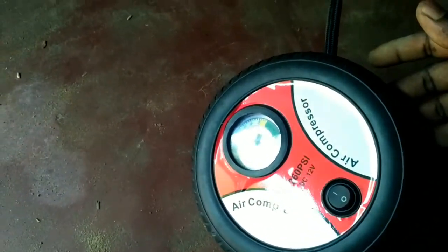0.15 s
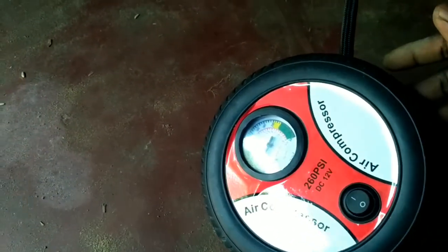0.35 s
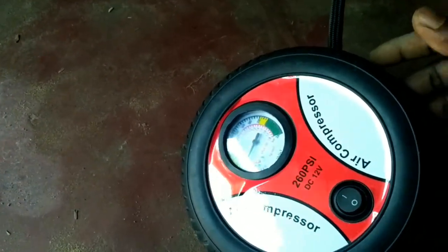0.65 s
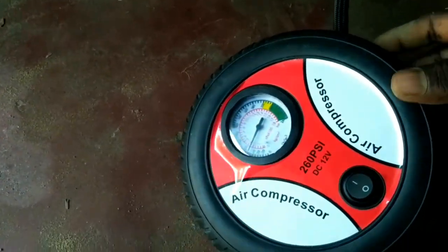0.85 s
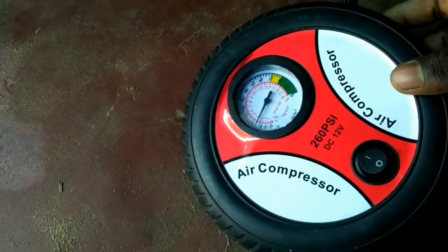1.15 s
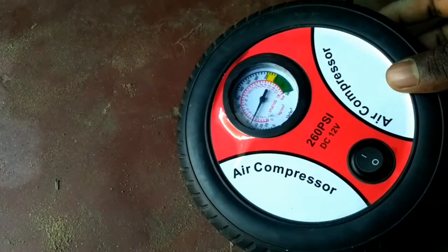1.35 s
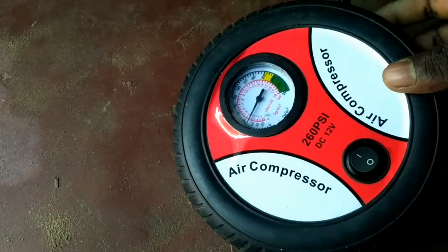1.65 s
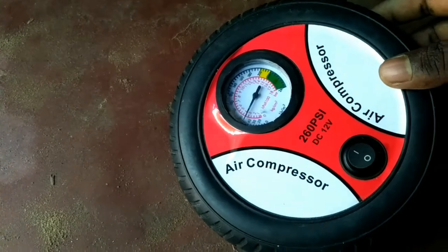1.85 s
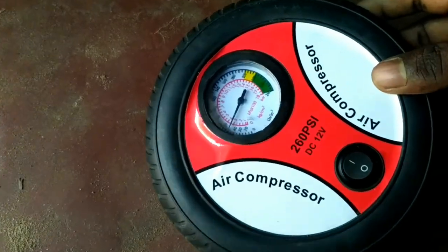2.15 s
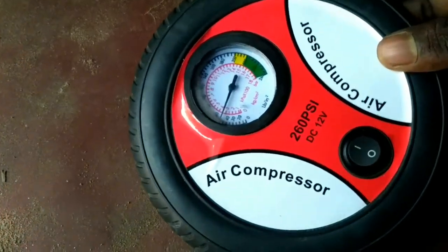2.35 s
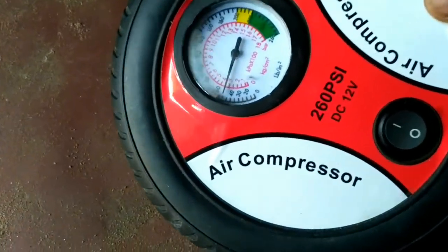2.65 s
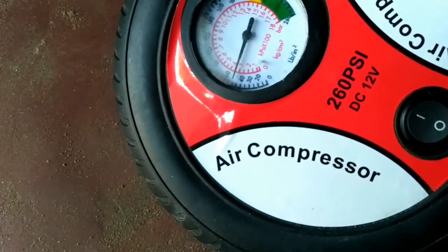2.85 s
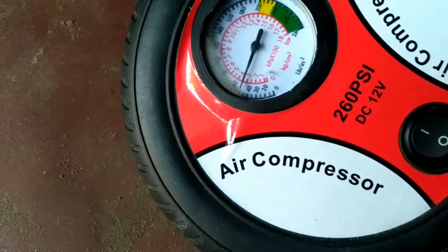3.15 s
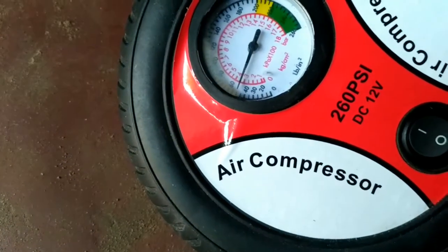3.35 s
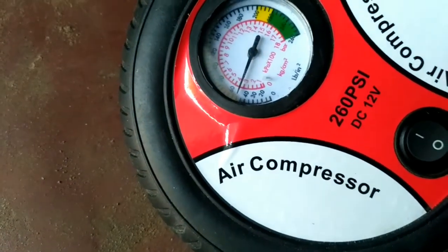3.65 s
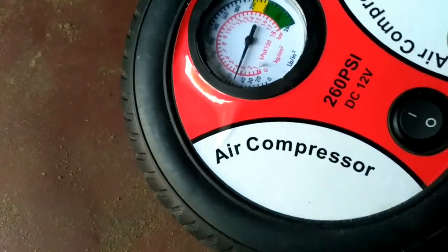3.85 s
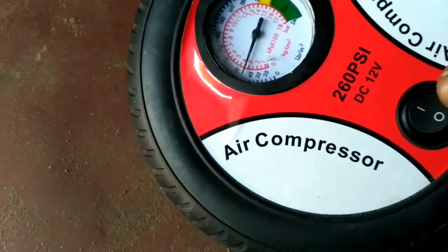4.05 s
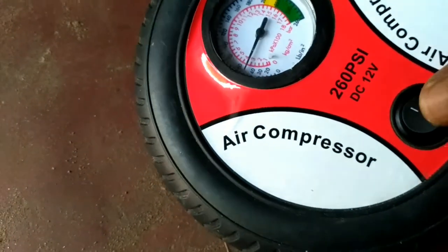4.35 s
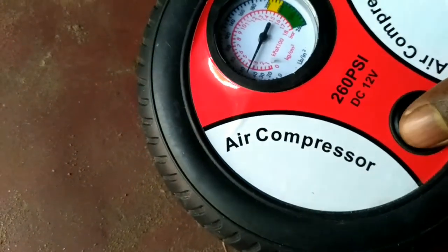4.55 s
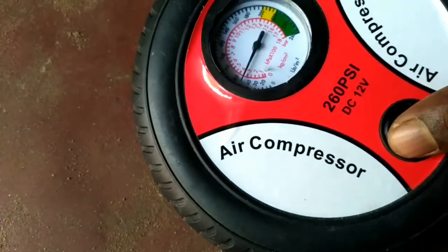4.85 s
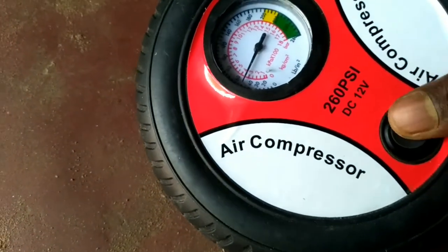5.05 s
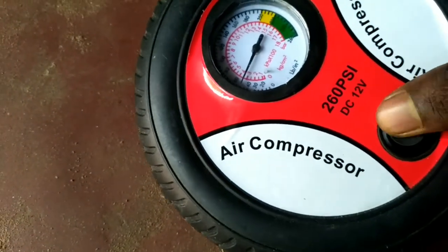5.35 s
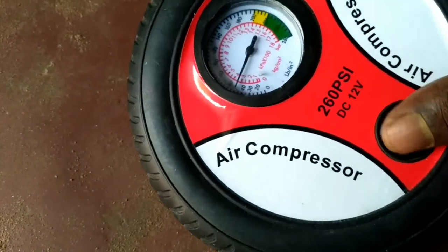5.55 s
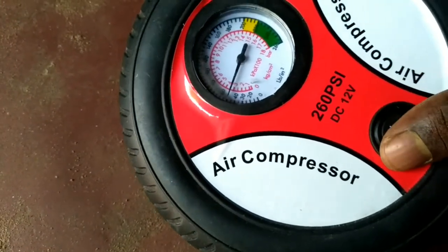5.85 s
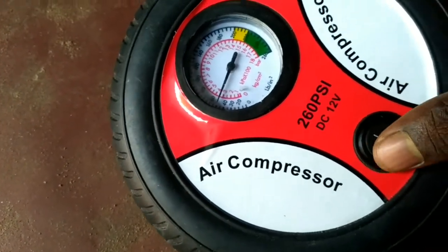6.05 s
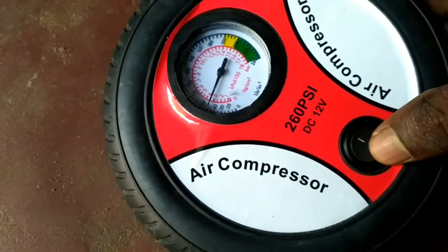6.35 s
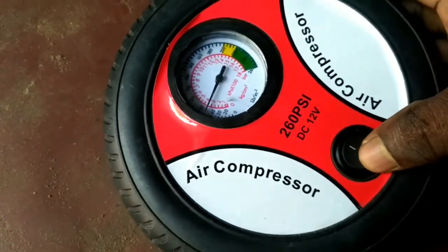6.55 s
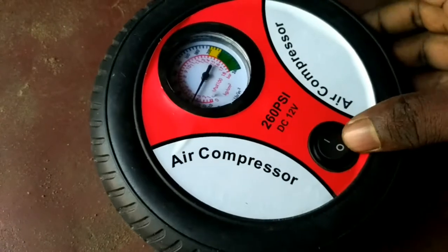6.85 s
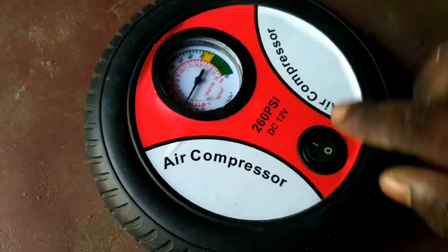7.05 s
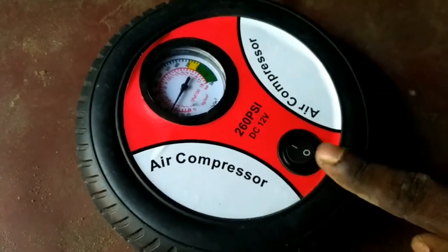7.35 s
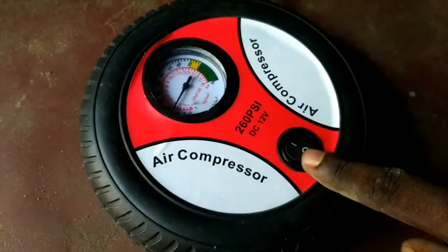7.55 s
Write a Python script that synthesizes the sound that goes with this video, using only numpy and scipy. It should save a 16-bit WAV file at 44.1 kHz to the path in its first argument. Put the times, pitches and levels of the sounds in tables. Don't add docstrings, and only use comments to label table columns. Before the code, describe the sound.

A small plastic-cased air pump is already running and never stops. Its piston hammers about 45 times a second, fusing into a rough buzz with motor hum, gear whine and gritty rasp. The tone shifts slightly as it is handled, chattering more around three seconds. Near the end a loosened cover adds a hollow boom and small ticks. Very close microphone, dry, flattened and loud.

```python
import sys
import numpy as np
from scipy import signal
from scipy.fft import rfft, irfft
from scipy.io import wavfile
from scipy.ndimage import uniform_filter1d, minimum_filter1d

SR = 44100
rng = np.random.default_rng(int(sys.argv[2]) if len(sys.argv) > 2 else 0)


def output_pcm(signal):
    pcm = np.clip(np.atleast_2d(signal).T, -1, 1) * 32767
    wavfile.write(sys.argv[1], SR, np.round(pcm).astype(np.int16))


def voltage_ratio(decibels):
    exponent = np.asarray(decibels, float) / 20
    return 10 ** exponent


N = 339570
T = np.arange(N) / SR
F = np.arange(N // 2 + 1) * SR / N
WHEEL, PINION = 51, 12
TOP_OF_STROKE_S = 1.055
FREE_RUN_HZ, THUMP_DB_PER_HZ, BEAT_DB_PER_HZ = 44.78, 7, -13

# (time [s], crank speed [Hz])
CRANK_SPEED = [(0.0, 44.99), (1.07, 44.93), (1.32, 45.22), (1.96, 44.7), (2.24, 44.93), (2.63, 44.41),
               (2.8, 44.76), (3.17, 44.75), (3.76, 44.98), (4.51, 44.73), (4.79, 43.71), (5.26, 44.54),
               (5.74, 44.48), (5.88, 44.0), (6.13, 44.44), (6.41, 43.94), (7.36, 44.35), (7.7, 43.97)]
# (frequency [Hz], level [dB], time to fade by 60 dB [s])
GEARBOX_MODES = [(2145, 5.5, 0.015), (2341, 7, 0.022), (2630, -0.5, 0.032), (2003, -15, 0.035),
                 (1460, -11.5, 0.0354), (1090, -8, 0.021), (3172, -6.5, 0.013)]
# (frequency [Hz], level [dB], time to fade by 60 dB [s])
BRACKET_MODES = [(9066, 6, 0.0059), (10030, 0.5, 0.0031), (10900, -4.5, 0.0032)]
# (frequency [Hz], level [dB], time to fade by 60 dB [s])
RASP_MODES = [(3760, -0.5, 0.035), (6460, 2, 0.017), (7000, -5, 0.0087)]
# (frequency [Hz], level [dB per Hz])
RASP_COLOUR = [(1200, -31), (2000, 4.5), (2700, 0), (3200, -17.5), (4200, -14), (8000, -11.5), (11000, -10),
               (12000, -17.5), (15500, -21.5)]
# (frequency [Hz], level [dB per Hz])
RATTLE_COLOUR = [(15, -40), (30, -13), (90, -17.5), (220, -4.5), (350, -7), (500, -2.5), (900, -10),
                 (1150, -13), (1500, -13.5), (1800, -16), (2600, -30), (3400, -34.5), (4500, -25),
                 (15500, -46)]
# (frequency [Hz], level [dB], time to fade by 60 dB [s])
LID_MODES = [(1490, 8.5, 0.0049), (2607, 20.5, 0.021), (4590, 11, 0.016), (4990, 14, 0.016),
             (6150, 5.5, 0.011), (6740, 12.5, 0.014), (10290, 9.5, 0.015)]
# (multiple of crank speed [-], level [dB])
THUMP_TONES = [(1, -12), (2, -16), (3, -6), (4, -10), (5, -1.5), (6, -12), (7, -6), (8, -2), (9, -5)]
# (frequency [Hz], level [dB])
SHELL_COLOUR = [(280, -28), (400, -2.5), (870, 1), (1050, -8.5), (1500, -36), (3000, -90)]
# (multiple of crank speed [-], level [dB])
CLUNK_TONES = [(10, -6.5), (11, -0.25), (12, -0.6), (13, -2.6)]
# (multiple of crank speed [-], level [dB])
KNOCK_TONES = [(14, 1), (15, -2.5), (16, -5), (17, -27), (18, -5.5), (19, -3), (21, -25), (22, -16),
               (25, -26)]
# (frequency [Hz], level [dB], time to fade by 60 dB [s])
SHELL_MODES = [(455, -7.5, 0.05), (518, -0.5, 0.046), (567, -2, 0.035), (628.3, 1, 0.079), (707, -2, 0.032),
               (783, -3.5, 0.071), (957.3, -12, 0.033)]
# (time [s], cover free of the finger [0-1])
COVER_FREE = [
    (0, 0),
    (6.64, 0),
    (6.72, 0.78),
    (7.45, 0.75),
    (7.58, .4),
    (7.7, .4),
]
# (frequency [Hz], level [dB], time to fade by 60 dB [s])
COVER_MODES = [(1500, -2, 0.0055), (2680, -3, 0.017), (3660, -5, 0.014), (1193, 8, 0.026)]
# (frequency [Hz], level [dB], time to fade by 60 dB [s])
MESH_MODES = [(2227, 0, 0.012)]
# (time [s], peak level [dB])
COVER_TICKS = [
    (6.7076, -31),
    (6.8766, -38),
    (7, -28),
    (7.124, -37),
    (7.5085, -35),
]
# (time [s], gear play [0-1], lid turned to the listener [-1..1],
# finger weight on the switch [0-1], pressure on the teeth [-1..1])
HANDLING = [(0, 0.02, .8, 0, 0.75), (.4, 0.02, 0.84, 0.06, 0.44), (1.0, 0.13, 0.64, 0.13, 0.21),
            (1.4, 0.09, 0.47, 0.06, -0.28), (2.1, 0.12, .4, 0.15, 0.23), (2.45, 0.19, 0.049, 0, 0.3),
            (2.8, 0.48, -0.59, 0.07, -0.04), (3.2, 0.68, -.9, 0, -0.39), (3.8, 0.67, -0.43, 0, -0.56),
            (4.2, 0.49, -0.18, 0.5, -0.36), (4.6, 0.05, -.7, .9, -0.3), (4.9, 0.09, -0.017, 0.84, .12),
            (5.3, 0.03, -0.61, 1, -0.16), (6.0, 0.1, -0.46, 0.6, 0.02), (6.6, .05, -.4, 0.2, 0.04),
            (7.0, .32, -0.069, 0, 0.25), (7.4, 0.26, 0.12, 0.44, 0.25), (7.7, 0.05, 0.42, 0.14, 0.8)]
# (at rest [dB], change with full play [dB], lid fully turned [dB],
# full finger weight [dB], cover free [dB], full tooth pressure [dB]); tilts are in dB per multiple
RESPONSE_DB = dict(whine_db=(-31.5, -0.5, 0.2, -0.16, 0, 9.5), rasp_db=(-45.5, 2, -0.4, 0, -1.2, -0.5),
               squeal_db=(-46, 2.5, 0.7, 0.7, -3.2, 6), lid_db=(-47.5, -3, 10.5, 3, -1.5, -1),
               hum_db=(-28, -0.2, -1.3, -4, -16, -1), clunk_db=(-27.5, 0.6, 0.5, 2.5, 3.5, -0.9),
               knock_db=(-29, 2.1, 1.3, 1.5, -4, -0.1), shake_db=(-28.5, -2.4, .8, 0.4, -3.5, 0.3),
               beat_db=(-37, 10, -2.5, 4, 6, 0.8), thump_db=(-42.5, 0.5, 1.4, 0.8, 6, 0.8),
               clunk_tilt_db=(-0.92, 2.5, -1.35, 2.5, 1.4, 0.3),
               knock_tilt_db=(0.2, -1.1, 0.36, 0.41, 2, -0.35))
LOAD_RESPONSE = dict(sharp=(3, 0.7, 1.5, -1, 1.2, .12), rebound=(0.33, -0.15, -0.054, .16, -0.41, .012))


def level(x, db):
    return x * voltage_ratio(db) / np.sqrt(np.mean(x ** 2))


def curves(table):
    s, *columns = np.transpose(table)
    return [np.interp(T, s, column) for column in columns]


def respond(rows, *controls):
    return {name: rest + sum(k * c for k, c in zip(slopes, controls))
            for name, (rest, *slopes) in rows.items()}


def ring(x, modes):
    gain = 0
    for k, (hz, db, t60) in enumerate(modes):
        half_width = np.log(1000) / (2 * np.pi * t60)
        gain = gain + (-1) ** k * voltage_ratio(db) * half_width / (half_width + 1j * (F - hz))
    return irfft(rfft(x) * gain, N)


def colour(x, points):
    hz, db = np.transpose(points)
    outline_db = np.interp(np.log(F + 1), np.log(hz), db)
    return irfft(rfft(x) * voltage_ratio(outline_db), N)


def clicks(count, size):
    at = np.interp(np.arange(len(size)), count, np.arange(N), left=0, right=0)
    whole, part = at.astype(int), at % 1
    size = size * (at > 0)
    early = np.bincount(whole, size * (1 - part), N + 1)
    late = np.bincount(whole + 1, size * part, N + 1)
    return (early + late)[:N]


def peak(turns, at, sharp):
    return np.exp(sharp * (np.cos(2 * np.pi * (turns - at)) - 1))


def wave(cycles):
    return np.sqrt(2) * np.cos(2 * np.pi * cycles)


def walk(rate):
    k = int(SR / rate)
    steps = np.repeat(rng.standard_normal(N // k + 1), k)
    return 1.8 * uniform_filter1d(steps, k)[:N]


def teeth(turns, wheel, pinion, loose):
    k = np.arange(int(turns[-1] * WHEEL))
    wheel_error = wheel * rng.standard_normal(WHEEL)[k % WHEEL]
    pinion_error = pinion * rng.standard_normal(PINION)[k % PINION]
    return wheel_error + pinion_error + loose * rng.standard_normal(len(k))


def compression(turns, top, sharp, lean):
    lean = np.clip(lean, 0, 0.15)
    return peak(turns - lean * np.cos(2 * np.pi * (turns - top)), top - lean, sharp)


def gear_whine(turns, accent, play, sharp, rebound, whine_db):
    push = compression(turns + 0.064, 0.0098, sharp + 1, 0.024) * accent
    mesh = level(ring(push * np.sin(2 * np.pi * WHEEL * turns), MESH_MODES), 0)
    spring_back = rebound * 3.2 * peak(turns, 0.54, 5.3) * accent
    mesh = mesh + spring_back * np.sin(2 * np.pi * (WHEEL - 2) * turns)
    load = (compression(turns, 0.06, sharp, 0.013) + rebound * peak(turns, 0.575, 19.0) + 0.071) * accent
    errors = clicks(WHEEL * turns, teeth(turns, wheel=0.7, pinion=0.44, loose=0.15))
    chatter = ring(load * errors, GEARBOX_MODES)
    return (1 - play) * level(mesh, whine_db) + np.sqrt(play) * level(chatter, whine_db + 3.5)


def tooth_grit(turns, accent):
    drag = (compression(turns, -0.003, 3.9, 0.16) + 0.2) * accent ** 0.57
    errors = clicks(WHEEL * turns, teeth(turns, wheel=0.75, pinion=0.53, loose=0.54))
    return drag * (level(errors, -4) + 0.76 * rng.standard_normal(N))


def gear_rasp(grit, rasp_db):
    brushes = 0.28 * rng.standard_normal(N)
    rasp = level(colour(level(grit, 0) + brushes, RASP_COLOUR), 3.05)
    return voltage_ratio(rasp_db) * (rasp + level(ring(grit, RASP_MODES), -10))


def bracket_squeal(turns, grit, accent, play, squeal_db):
    sing = play * peak(turns, -0.15, 2.5) * accent * np.sin(2 * np.pi * 4 * WHEEL * turns)
    gritty = (1 - 0.3 * play) * level(ring(grit, BRACKET_MODES), -1.9)
    return voltage_ratio(squeal_db) * (gritty + 3.45 * ring(sing, BRACKET_MODES[:1]))


def lid_ring(turns, grit, lid_db):
    tap = 0.7 + peak(turns / 4, 0.725, 30)
    return level(ring(grit * tap, LID_MODES), lid_db)


def gears(turns, motor, play, db, load):
    fourth_stroke = 1 + (0.036 + 0.096 * play) * np.cos(2 * np.pi * (turns / 4 + 0.2))
    accent = fourth_stroke * (1 + 0.25 * np.cos(2 * np.pi * (motor + 0.25)))
    sharp, rebound = np.clip(load["sharp"], 0, 9), np.clip(load["rebound"], 0, 1)
    whine = gear_whine(turns, accent, play, sharp, rebound, db["whine_db"])
    grit = tooth_grit(turns, accent)
    rasp = gear_rasp(grit, db["rasp_db"])
    squeal = bracket_squeal(turns, grit, accent, play, db["squeal_db"])
    return whine + rasp + squeal + lid_ring(turns, grit, db["lid_db"])


def blow(even, tones, at, lag, waver_db, tilt_db=0):
    middle = np.mean(np.transpose(tones)[0])
    total = 0
    for k, db in tones:
        strength = voltage_ratio(db + tilt_db * (k - middle) + waver_db * walk(6))
        total = total + strength * np.cos(2 * np.pi * (k * (even - at) + lag(k)))
    return level(total, 0)


def rod_blows(even, db):
    clunk = blow(even, CLUNK_TONES, 0, lambda k: -0.4 + (k < 11) / 2, 1.0, db["clunk_tilt_db"])
    knock = blow(even, KNOCK_TONES, 0.42, lambda k: 0.05, 1.3, db["knock_tilt_db"])
    knock = knock * (1 - 0.5 * curves(COVER_FREE)[0])
    thump = blow(even, THUMP_TONES, 0.231, lambda k: rng.random(), 1.66)
    return clunk * voltage_ratio(db["clunk_db"]) + knock * voltage_ratio(db["knock_db"]) + thump * voltage_ratio(db["thump_db"])


def motor_hum(turns, motor, db):
    hum = wave(3 * motor + 0.11)
    beat = wave(motor + 8 * turns + 0.3)
    return hum * voltage_ratio(db["hum_db"]) + beat * voltage_ratio(db["beat_db"])


def shell_shake(turns, db):
    errors = clicks(WHEEL * turns, teeth(turns, wheel=0.055, pinion=0.42, loose=0.25))
    errors = errors * (peak(turns, 0.089, 3.7) + 1.01 * peak(turns, 0.516, 5.5))
    return level(ring(colour(errors, SHELL_COLOUR), SHELL_MODES), 0) * voltage_ratio(db["shake_db"])


def loose_rattle(turns):
    loose = clicks(WHEEL * turns, teeth(turns, wheel=0.19, pinion=0.36, loose=0.27))
    loose = loose * (peak(turns, 1.0, 2.2) + 0.91)
    return level(colour(level(loose, 0) + 0.5 * rng.standard_normal(N), RATTLE_COLOUR), -35.0)


def cover(even, turns):
    free = curves(COVER_FREE)[0]
    boom = voltage_ratio(-30.0) * wave(12 * even - 0.45)
    taps = clicks(3 * turns - 0.3, rng.exponential(1, int(turns[-1] * 3)))
    patter = level(ring(taps, COVER_MODES), -42.5)
    s, peak_db = np.transpose(COVER_TICKS)
    ticks = ring(np.bincount((s * SR).astype(int), voltage_ratio(peak_db), N), COVER_MODES)
    return free * (boom + patter) + voltage_ratio(36.5) * ticks


def scene():
    speed_hz = curves(CRANK_SPEED)[0]
    even = np.cumsum(speed_hz) / SR
    even = even - np.interp(TOP_OF_STROKE_S, T, even) + 48
    turns = even - 0.006 * np.sin(2 * np.pi * (even + 0.0092))
    motor = turns * WHEEL / PINION
    play, facing, finger, pressure = curves(HANDLING)
    play, finger = np.clip(play, 0, 1), np.clip(finger, 0, 1)
    controls = play, facing, finger, curves(COVER_FREE)[0], pressure
    db, load = respond(RESPONSE_DB, *controls), respond(LOAD_RESPONSE, *controls)
    sag_hz = np.clip(FREE_RUN_HZ - speed_hz, 0, None) * finger
    db["beat_db"] = db["beat_db"] + BEAT_DB_PER_HZ * sag_hz
    db["thump_db"] = db["thump_db"] + THUMP_DB_PER_HZ * sag_hz
    mesh = gears(turns, motor, play, db, load)
    body = rod_blows(even, db) + motor_hum(turns, motor, db) + shell_shake(turns, db) + loose_rattle(turns)
    return (mesh + body + cover(even, turns))[None]


def low_pass(x):
    return signal.sosfilt(signal.butter(12, 15720, fs=SR, output="sos"), x)


def record(dry):
    hot, ceiling = dry * voltage_ratio(6.5), voltage_ratio(-15.0)
    hold = int(0.00081 * SR)
    crest = uniform_filter1d(-minimum_filter1d(-np.abs(hot), hold), hold)
    held = hot * ceiling / (crest ** 6 + ceiling ** 6) ** (1 / 6)
    return low_pass(held)


dry = scene()
out = record(dry)
output_pcm(out)
```